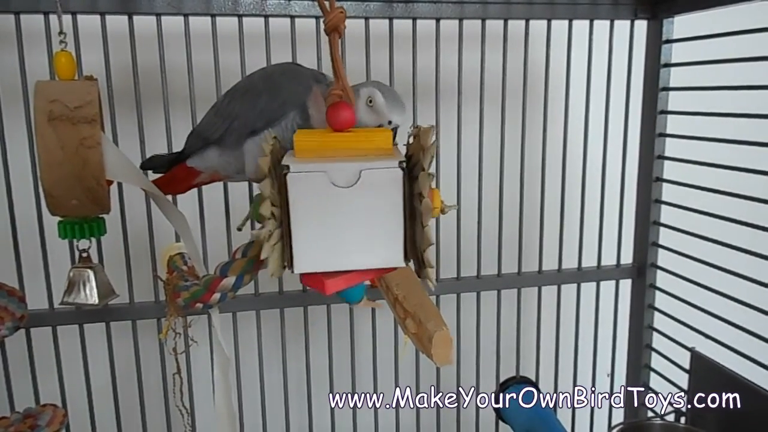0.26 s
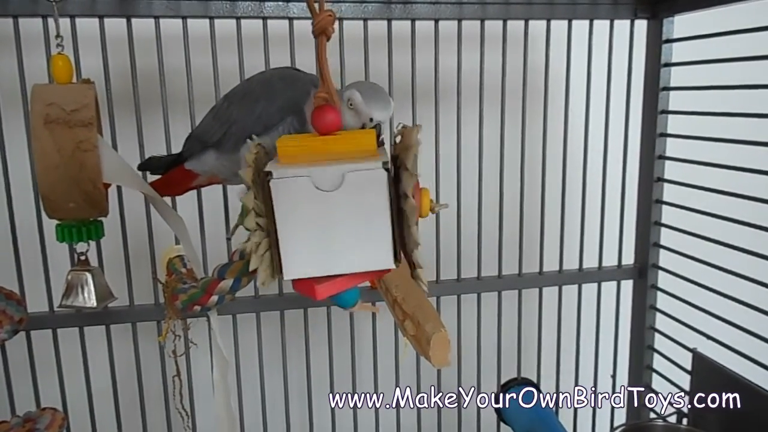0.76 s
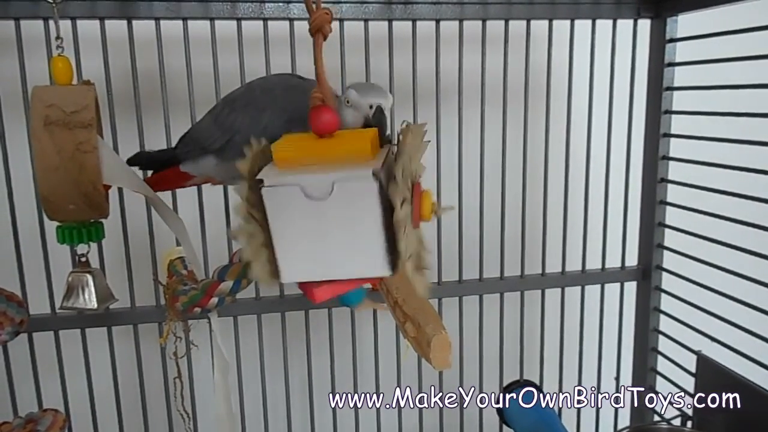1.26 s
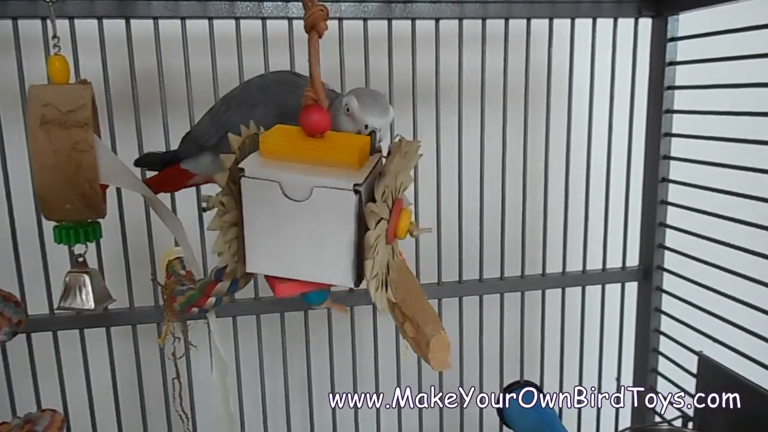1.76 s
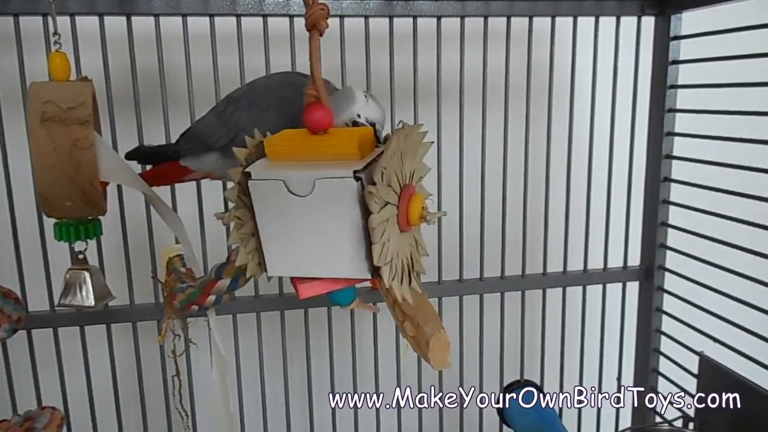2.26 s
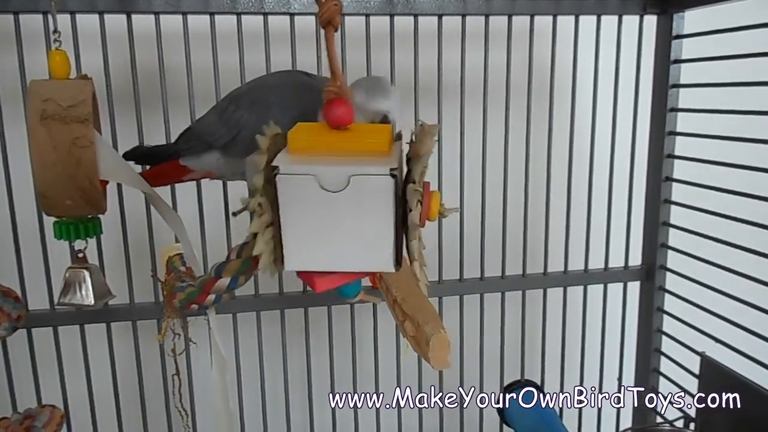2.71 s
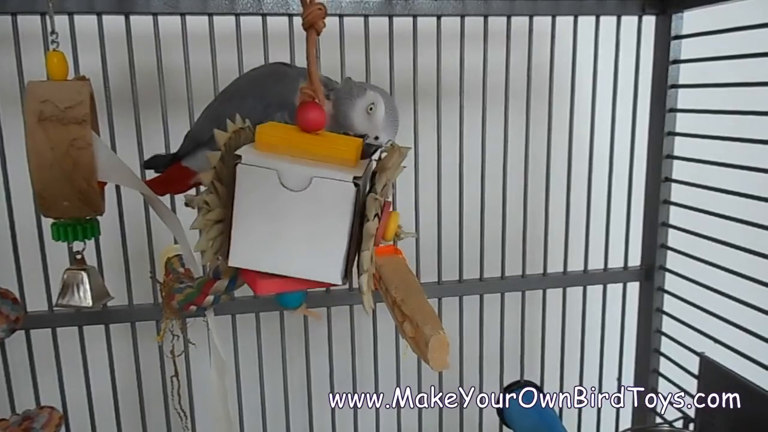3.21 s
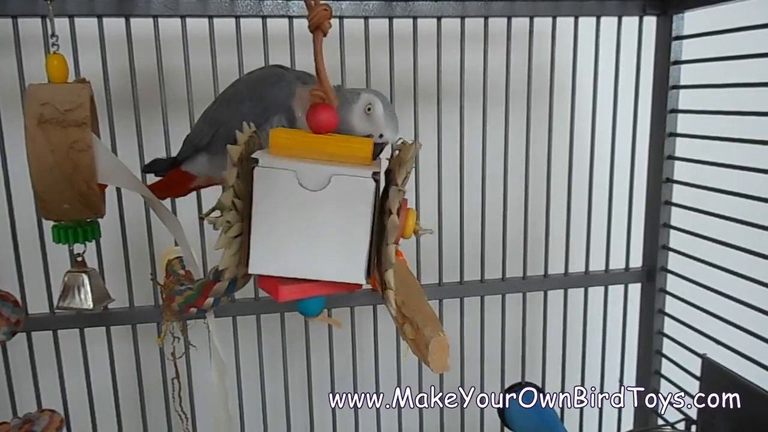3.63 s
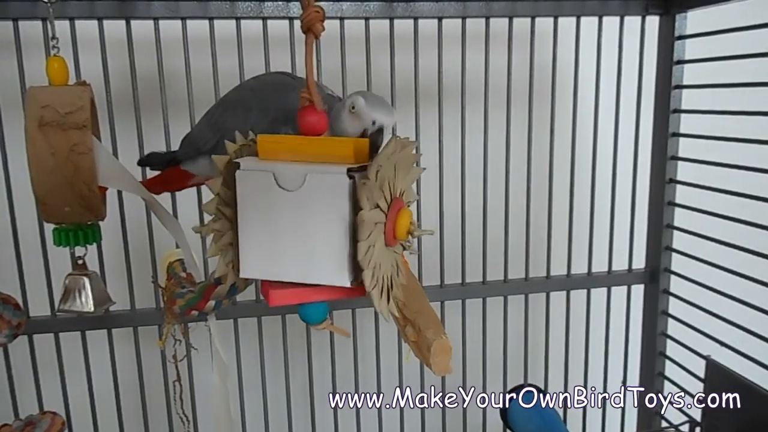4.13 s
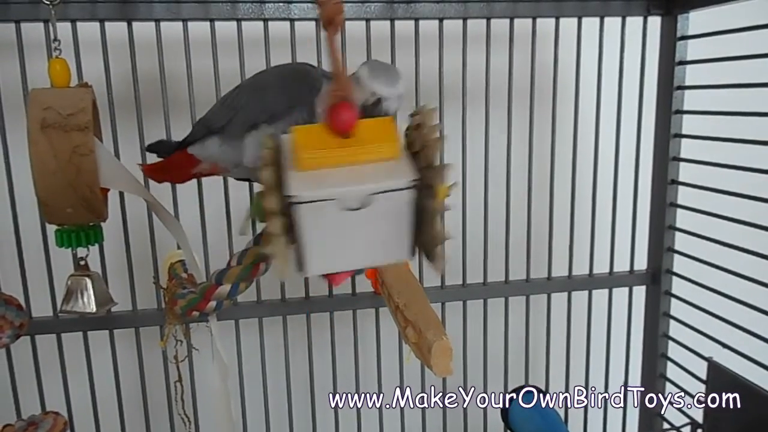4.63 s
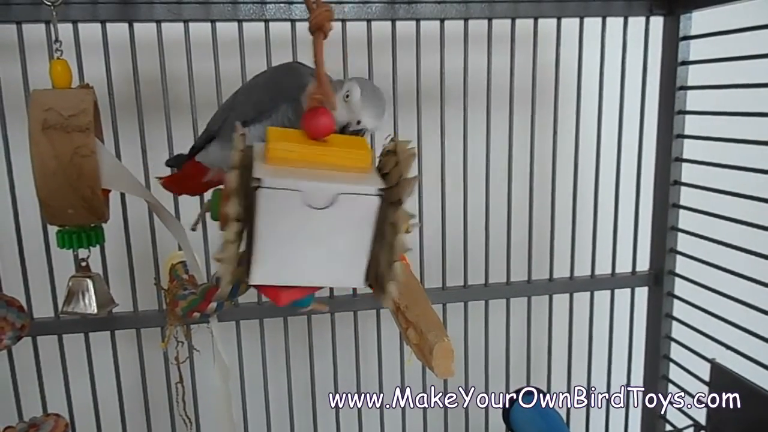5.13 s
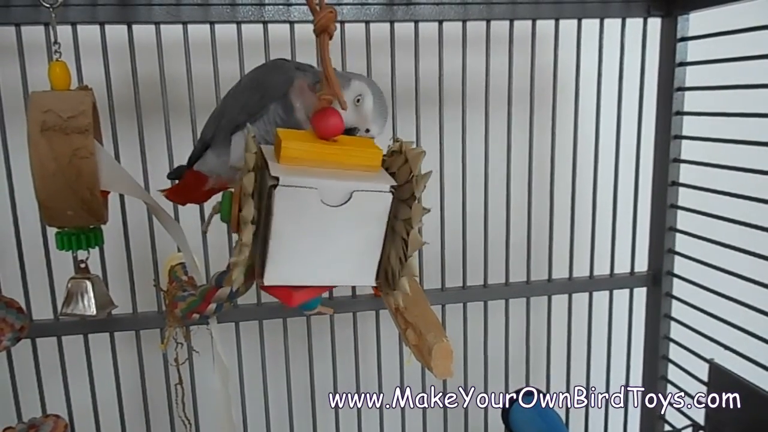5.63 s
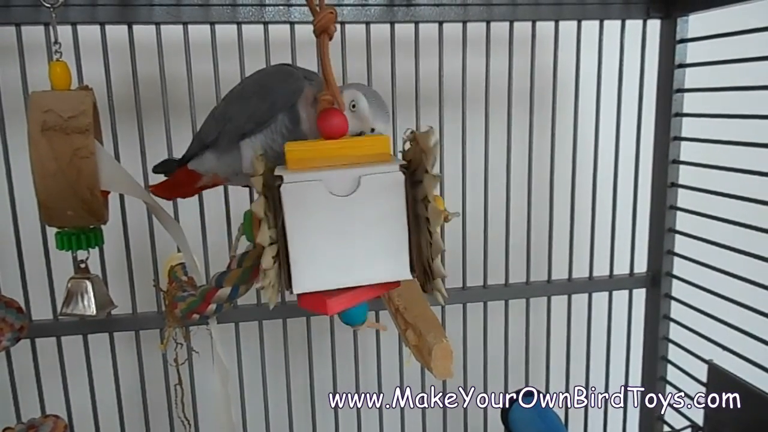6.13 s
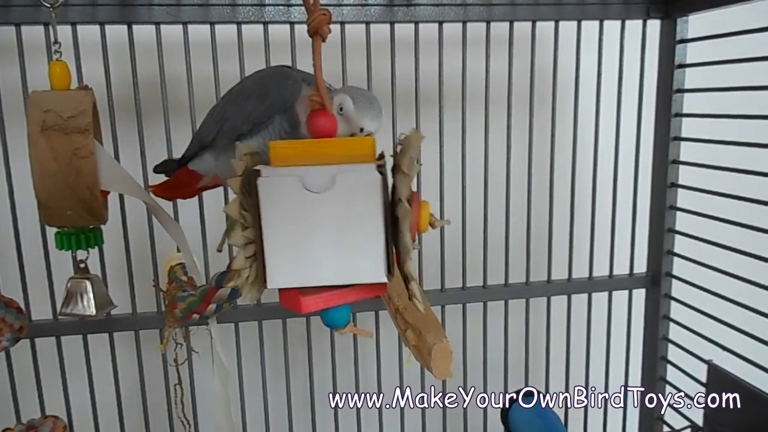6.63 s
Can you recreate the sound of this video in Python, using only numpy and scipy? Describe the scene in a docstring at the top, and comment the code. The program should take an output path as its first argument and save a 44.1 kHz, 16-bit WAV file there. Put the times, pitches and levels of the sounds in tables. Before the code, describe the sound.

Close to a cage indoors, a parrot's beak works a toy of cardboard and stiff dry leaf. Small creaks and crinkles come first, then a hollow rap and very loud cracking snaps. Midway a hard knock leads into a dull cardboard scrape. Irregular snaps and quiet rustling follow, ending on a raspy strip drag. A small microphone adds hiss and overloads on the hardest cracks.

```python
"""A parrot chews and tugs a hanging toy of cardboard and dry woven leaf in a cage indoors.
From the start: steady hiss, a faint rustle, creaks, and breaking fibres that snap and crinkle in leaf and box.
Thin dry ticks soon join; after a second the beak raps the hollow box, then torn strips ring single notes.
Midway the beak scrapes the cardboard once; at the very end a strip is dragged through it.
The room adds a tail, a low rumble swells under the loud sounds, and the small microphone overloads on the hardest."""
import sys
import numpy as np
from scipy import signal
from scipy.io import wavfile
from scipy.ndimage import uniform_filter1d

SR = 44100
rng = np.random.default_rng(int(sys.argv[2]) if len(sys.argv) > 2 else 0)


def persist_wave(psi):
    """Save psi, clipped to +-1, as 16-bit WAV."""
    counts = np.round(np.clip(psi, -1, 1) * 32767).astype(np.int16)
    wavfile.write(sys.argv[1], SR, np.atleast_2d(counts).T)


N = 302526  # length of the scene in samples


def amp(db):
    """Turn decibels into a plain multiplier."""
    return 10 ** (np.asarray(db) / 20)


def evened(x):
    """Scale a signal to an average (RMS) level of 1."""
    return x / np.sqrt(np.mean(x ** 2) + 1e-20)


def read(points, hz):
    """Read a curve between its points, on a logarithmic pitch scale."""
    point_hz, value = np.transpose(points)
    return np.interp(np.log(hz + 1), np.log(point_hz + 1), value)


def add(mix, s, sound):
    """Mix a sound in at time s, cutting off what runs past the end."""
    part = mix[..., round(s * SR):][..., :sound.shape[-1]]
    part += sound[..., :part.shape[-1]]


def soft_noise(shape, hold):
    """Slow random drift: noise averaged twice over `hold` samples."""
    return uniform_filter1d(uniform_filter1d(rng.standard_normal(shape), hold), hold)


def stroke_samples(length):
    """Length of a stroke in samples, kept between 0.01 and 0.3 s."""
    return round(np.clip(length, .01, .3) * SR)


def ring(modes, tilt_db=0, spread_db=0):
    """Response of a body to one click: sines that swell briefly and die, energy 1.
    Each spot that is bitten wakes the modes by other amounts, slightly off pitch."""
    t = np.arange(2048) / SR
    hz, width, db = np.transpose(modes)[..., None]
    db = db + tilt_db * np.log2(hz / hz[1])
    db = db + spread_db * rng.standard_normal(hz.shape)
    hz = hz * (1 + 0.018 * spread_db * rng.standard_normal(hz.shape))
    swell = width ** 1.647 * t * np.exp(-1.5 * np.pi * width * t)
    response = (amp(db) * swell * np.sin(2 * np.pi * hz * t)).sum(0)
    return response / np.linalg.norm(response)


def colour(points):
    """Filter response with the given spectrum that never sounds before its cause."""
    db = read(points, abs(np.fft.fftfreq(4096, 1 / SR)))
    log_gain = np.log(amp(np.maximum(db, -100)))
    return np.fft.ifft(np.exp(np.conj(signal.hilbert(log_gain)))).real[:2048]


def fibres(length, per_s, spread_db):
    """A train of tiny breaks of random sign, a few much larger than the rest."""
    chance, sign, size = rng.random((3, length))
    size_db = spread_db * np.minimum(-np.log(size + 1e-9), 4)
    return evened((chance < per_s / SR) * np.sign(sign - .5) * amp(size_db))


def crinkle(length):
    """Clumped fibre breaks; leaf, box and top flex partly together, partly on their own."""
    clumps = amp(2.16 * evened(soft_noise(length, 200)))
    shared = fibres(length, 2500, 2.6)
    own = np.array([fibres(length, 4000, 4.25) for _ in range(3)])
    return evened(clumps) * (0.9 * shared + 1.245 * own)


# Modes of the stiff leaf: (pitch [Hz], width [Hz], level before the width weighting [dB])
LEAF_MODES = [(2063, 102, 2), (2445, 262, 10.5), (2777, 260, 6.5), (3067, 72, 3.5), (3382, 990, 10)]
# Modes of the bitten box: (pitch [Hz], width [Hz], level before the width weighting [dB])
BOX_MODES = [(447, 730, 19), (761, 265, 21), (966, 163, 21), (1211.5, 103, 25.5), (1780, 260, 11)]
# Average spectrum of the crisp top: (pitch [Hz], level per Hz [dB])
CRISP_TOP = [(3000, -34), (4500, 8), (5500, 6), (7000, -0.5), (10000, -0.5), (12500, 0)]


def sounded(drive, leaf_tilt_db=0, box_tilt_db=0, spread_db=3.0):
    """Breaks ring the leaf, the box and the crisp top, which is lumpy in its own way at each spot."""
    hz = np.geomspace(CRISP_TOP[0][0], CRISP_TOP[-1][0], num=20)
    lumpy_db = read(CRISP_TOP, hz) + spread_db * rng.standard_normal(len(hz))
    crisp = colour(np.transpose([hz, lumpy_db]))
    leaf = ring(LEAF_MODES, leaf_tilt_db, spread_db)
    box = ring(BOX_MODES, box_tilt_db, spread_db)
    bodies = leaf, box, crisp / np.linalg.norm(crisp)
    return sum(signal.oaconvolve(row, body) for row, body in zip(drive, bodies))


def wandering(drive, hold, depth_db, *tilts_db, spread_db, count):
    """The breaks drift between several spots of the toy, each with its own ring."""
    share = amp(depth_db * evened(soft_noise((count, drive.shape[1]), hold)))
    share = share / np.linalg.norm(share, axis=0)  # the spots share one constant power
    return sum(sounded(drive * part, *tilts_db, spread_db=spread_db) for part in share)


# Spectrum of the hiss: (pitch [Hz], level per Hz [dB])
AIR_SPECTRUM = [(200, -1.5), (1000, 13), (5000, -2), (16000, -10.5)]
AIR_DB = -51  # hiss level before the microphone


def air():
    """Steady room hiss: random noise with a fixed colour."""
    noise = rng.standard_normal(N + 2048)
    hiss = signal.oaconvolve(noise, colour(AIR_SPECTRUM))[2048:N + 2048]
    return amp(AIR_DB) * evened(hiss)


# Faint rustle of the swinging toy: (time [s], leaf level [dB])
RUSTLE_LEVELS = [(0.0, -51), (0.53, -57.5), (1.03, -50), (2.25, -58.5), (3.28, -50.5), (3.4, -47.5),
                 (4.17, -54), (4.62, -45), (4.93, -49.5), (5.2, -47), (6.67, -58.5), (6.86, -45)]


def rustle():
    """A low bed of crinkle that follows the swing."""
    db = np.interp(np.arange(N) / SR, *np.transpose(RUSTLE_LEVELS))
    rows_db = db + np.array([[0], [-5], [-8]])  # leaf, box, crisp top
    return wandering(crinkle(N) * amp(rows_db), 3000, 5.5, spread_db=4, count=6)[:N]


# Creaks of a rubbed wall or leaf: (time [s], length [s], level [dB], first pitch [Hz], last pitch [Hz])
CREAK_EVENTS = [(0.009, 0.2, -38, 1300, 1370), (0.035, 0.045, -30.5, 2500, 3100),
                (0.098, 0.085, -35, 2300, 2640), (0.212, 0.031, -24.5, 3700, 3760),
                (0.484, 0.096, -42, 754, 720), (0.832, 0.041, -26.5, 4140, 2700),
                (0.91, 0.074, -39.5, 1300, 1260), (1.122, 0.094, -43.5, 820, 770),
                (1.939, 0.074, -39, 2200, 2260), (1.972, 0.044, -34, 770, 875)]
CREAK_Q = 4.3  # first pitch divided by band width


def creaks():
    """Uneven slips ring one sliding band of the rubbed part."""
    out = np.zeros(N)
    for s, length, db, hz, end_hz in CREAK_EVENTS:
        n = stroke_samples(length)
        turn = np.exp(2j * np.pi * np.cumsum(np.linspace(hz, end_hz, n)) / SR)
        r = np.exp(-np.pi * hz / CREAK_Q / SR)
        slips = fibres(SR // 3, 900, 2.9)[:n]
        # shift the moving band down to zero, let it ring there, then shift it back
        sound = (turn * signal.lfilter([1], [1, -2 * r, r * r], slips / turn)).real
        add(out, s, amp(db) * evened(sound) * signal.windows.tukey(n, .3))
    return out


# Snaps: (time [s], leaf level [dB], box level above leaf [dB], crisp top level above leaf [dB])
SNAP_EVENTS = [(0.014, -21, -12, -20), (0.1918, -18, -11, 1), (0.7563, -26, -6.5, -2),
               (0.825, -25.5, -25, -10), (0.9817, -27, -56, -6), (1.0235, -29.5, -27, 0),
               (1.099, -23, -15, 0), (1.2839, -25.5, -43, 1), (1.4316, -5.5, -12.5, -14.5),
               (1.5064, -6.5, -9, -7.5), (1.796, -24.5, -6, -9), (2.1458, -21.5, -3.5, 1),
               (2.1824, -24.5, -4.5, -5), (2.6021, -26, -10, -3), (2.6563, -28, -20, -6),
               (3.229, -26.5, -13, -7.5), (3.2637, -9, 0, -14.5), (3.4254, -16.5, -4, -8.5),
               (3.786, -25, -6, -6.5), (4.0527, -28.5, -9, -3.5), (4.08, -33, -24, -14),
               (4.245, -37.5, -36, -2), (4.2608, -28, -3, -2.5), (4.5342, -14, -6.5, -5.5),
               (4.582, -24.5, -6.5, 0.5), (4.6476, -12.5, -10.5, -10), (4.7779, -38, 9, 11),
               (4.9713, -29.5, 1, -25), (5.485, -25, -3.5, -4), (5.7871, -12.5, -7, -7),
               (5.8791, -19.5, -4, -6), (5.9432, -34, -1, 5), (6.1584, -24, -2.5, -2.5)]
# brightness rule: a quieter box tilts the leaf up (dB per octave for each dB away from even)
LEAF_TILT, EVEN_BOX_DB = -0.76, -10


def snaps():
    """Each snap is one break, then a dying burst of smaller ones; a harder snap tears on for longer."""
    out, t = np.zeros(N), np.arange(SR // 16) / SR
    for s, db, box_db, top_db in SNAP_EVENTS:
        hold = np.clip(0.0015 + 0.00062 * (db + 11.5), 0, .01)  # seconds before the burst fades
        fade_db = -60 * np.maximum(t - hold, 0) / 0.047
        burst = fibres(len(t), 9000, 4.67) * amp(fade_db)
        burst[0] += 4.5  # the first break
        drive = burst * amp([[db], [db + box_db], [db + top_db]])
        leaf_tilt_db = LEAF_TILT * (box_db - EVEN_BOX_DB)
        add(out, s, wandering(drive, 60, 14.4, leaf_tilt_db, spread_db=2.5, count=3))
    return out


# The beak crunches and drags:
# (time [s], length [s], leaf level [dB], box level above leaf [dB], crisp top level above leaf [dB])
STROKE_EVENTS = [(0.02, 0.2, -41, -14, -10.5), (0.079, 0.015, -32, -17, -14), (0.197, 0.062, -36, -4.5, 1),
                 (0.479, 0.12, -46, -3.5, -3), (0.678, 0.017, -42, -10.5, -3.5),
                 (0.751, 0.03, -36.5, -12.5, -4), (0.827, 0.062, -34.5, -22, -7.5),
                 (0.908, 0.12, -40, -12.5, -5), (1.113, 0.13, -42, -8, -3.5),
                 (1.269, 0.012, -32.5, -12, -12), (1.358, 0.022, -45, -28, 2),
                 (1.445, 0.16, -30, -7.5, -7.5), (1.743, 0.12, -42.5, -7, -2), (1.927, 0.098, -42, -5, -10),
                 (2.059, 0.032, -46.5, -1.5, -5.5), (2.172, 0.042, -38, -2.5, -2),
                 (2.262, 0.032, -43, -7.5, -7.5), (2.368, 0.046, -50.5, -3, -14),
                 (2.509, 0.13, -38.5, -5, -3.5), (2.708, 0.21, -46.5, -5.5, -8),
                 (2.822, 0.076, -38, -10, -11.5), (2.983, 0.041, -46.5, -4.5, -2),
                 (3.459, 0.055, -33, -9, -4), (3.653, 0.086, -45.5, -7.5, 0),
                 (3.723, 0.08, -39.5, -6, -1.5), (3.843, 0.13, -53, -5.5, -7),
                 (4.044, 0.051, -42, -4.5, -1), (4.259, 0.2, -54, 7, -32), (4.431, 0.13, -42, -4, -9),
                 (4.566, 0.078, -39, -3.5, -3), (4.65, 0.048, -29.5, -7, -4.5),
                 (4.701, 0.032, -28, -8, -3.5), (4.791, 0.13, -41.5, -1, -3),
                 (4.981, 0.12, -43.5, 1.5, -5.5), (5.095, 0.06, -40.5, 2.5, -5),
                 (5.421, 0.065, -36, -8.5, -3.5), (5.502, 0.047, -38.5, -6.5, -5),
                 (5.758, 0.019, -32.5, -1.5, -6), (5.802, 0.11, -43.5, -6, -2),
                 (6.013, 0.084, -50.5, 2, -18), (6.169, 0.073, -42, -5, -0.5), (6.491, 0.045, -45, 1, 0.5),
                 (6.738, 0.034, -46.5, 0.5, 3.5)]
BOX_TILT, DRAG_BOX_DB = -0.22, -8  # in a drag a quieter box is tilted up as well
DRAG_SPREAD_DB = 2  # a dragging beak slides over several spots that ring differently


def strokes():
    """Each stroke swells, crinkles and stops."""
    out = np.zeros(N)
    for s, length, db, box_db, top_db in STROKE_EVENTS:
        n = stroke_samples(length)
        drive = crinkle(SR // 3) * amp([[db], [db + box_db], [db + top_db]])
        drive *= np.pad(signal.windows.tukey(n, .5), (0, SR // 3 - n))
        tilts_db = LEAF_TILT * (box_db - EVEN_BOX_DB), BOX_TILT * (box_db - DRAG_BOX_DB)
        add(out, s, wandering(drive, 400, 4.7, *tilts_db, spread_db=DRAG_SPREAD_DB, count=3))
    return out


RUMBLE_DB, RUMBLE_HZ, RUMBLE_S = -34.5, 71, 0.027  # gain, top of the rumble, smoothing time


def rumble(toy):
    """A low rumble: deep noise follows the smoothed strength of the toy."""
    lowpass = signal.butter(2, RUMBLE_HZ, fs=SR, output="sos")
    low = signal.sosfilt(lowpass, rng.standard_normal(N))
    r = np.exp(-1 / (RUMBLE_S * SR))
    return amp(RUMBLE_DB) * evened(low) * signal.lfilter([1 - r], [1, -r], abs(toy))


# Dying time of the room's echoes: (pitch [Hz], time to fall 60 dB [s])
ROOM_DECAY = [(500, 0.89), (3000, 0.6), (8000, 0.48)]


def room(x):
    """Sparse echoes of random sign from bars and walls, each band dying at its own speed."""
    taps, at = np.zeros(SR // 2), np.arange(200, SR // 2 - 20, 20)
    taps[at + rng.integers(0, 20, len(at))] = rng.choice([-1., 1.], len(at))
    hz, t, bands = signal.stft(taps, SR, nperseg=256)
    decay_s = np.maximum(read(ROOM_DECAY, hz), .05)[:, None]
    tail = signal.istft(bands * amp(-60 * t / decay_s), SR, nperseg=256)[1]
    return signal.oaconvolve(x, tail / np.linalg.norm(tail))[:N]


# Single dry fibres that stand out: (time [s], level [dB])
TICK_EVENTS = [(0.391, -13), (0.738, -11), (1.7514, -12), (1.8524, -13), (2.837, -19), (3.017, -12.5)]


def ticks():
    """Thin dry ticks: single breaks, mostly in the crisp top."""
    breaks = np.zeros(N)
    for s, db in TICK_EVENTS:
        add(breaks, s, amp([db]))
    return sounded(breaks * amp([[-4], [-15], [0]]))[:N]  # leaf, box, crisp top


# The beak raps the box: (time [s], peak level [dB], pitch that the spot favours [Hz], stiff face level [dB])
KNOCK_EVENTS = [(1.2638, -6.5, 650, 3), (3.2633, -1.5, 1014, 6.5), (6.159, -11, 900, -20)]
# Air and walls of the box: (pitch [Hz], width [Hz], level at the favoured pitch [dB])
HOLLOW_MODES = [(580, 104, -2.5), (697, 68, 3.5), (767, 83, 5), (934, 51, -2), (1031, 64, 4.5),
                (1204, 65, 1.5)]
SPOT_FALL_DB = -20  # modes fall off per octave from the favoured pitch
FACE_HZ, FACE_WIDTH = 2390, 140  # ring of the stiff face: pitch and width in Hz


def knocks():
    """A rap sets the hollow box and its face ringing at once."""
    out, t = np.zeros(N), np.arange(2048) / SR
    onset = np.sin(np.pi / 2 * np.minimum(1, t / 0.0016)) ** 2
    for s, peak_db, spot_hz, face_db in KNOCK_EVENTS:
        modes = [(hz, width, db + SPOT_FALL_DB * abs(np.log2(hz / spot_hz)))
                 for hz, width, db in HOLLOW_MODES]
        modes.append((FACE_HZ, FACE_WIDTH, face_db))
        sound = sum(amp(db) * np.exp(-np.pi * width * t) * np.sin(2 * np.pi * hz * t)
                    for hz, width, db in modes)
        sound = sound * onset
        add(out, s, amp(peak_db) * sound / abs(sound).max())
    return out


# A stiff leaf strip breaks clean and rings one note: (time [s], level [dB], pitch [Hz])
PING_EVENTS = [(1.506, 0, 2340), (1.5588, -3, 2070), (3.2643, -6, 3740), (3.424, -2, 3830),
               (4.7028, -3.5, 2750), (4.9716, -15.5, 2400), (5.787, 3.5, 2880), (5.8805, -4.5, 2300)]
PING_Q, PING_CLICK = 7, 0.77  # pitch divided by width; click size relative to the note


def pings():
    """A click, then a few cycles of the freed strip."""
    out, t = np.zeros(N), np.arange(1024) / SR
    for s, db, hz in PING_EVENTS:
        sound = np.exp(-np.pi * hz / PING_Q * t) * np.sin(2 * np.pi * hz * t)
        sound[0] += PING_CLICK
        add(out, s, amp(db) * sound)
    return out


# The beak scrapes the cardboard face: (time [s], length [s], starting level [dB])
SCRAPE_EVENTS = [(3.287, 0.168, -23)]
# Spectrum of scraped cardboard: (pitch [Hz], level per Hz [dB])
CARD_SPECTRUM = [(400, -58), (760, -10), (1250, 8), (2050, -4), (2450, -3), (3340, -19), (5860, -20),
                 (9000, -55)]
SCRAPE_FADE_DB = -7  # change over the length of a scrape


def scrapes():
    """A dense, dull rasp of many tiny breaks that rises quickly and fades."""
    out, card = np.zeros(N), colour(CARD_SPECTRUM)
    for s, length, db in SCRAPE_EVENTS:
        n = stroke_samples(length)
        rasping = evened(signal.oaconvolve(fibres(SR // 3, 7000, 3.0), card))[:n]
        level = amp(db + SCRAPE_FADE_DB * np.arange(n) / n)
        add(out, s, level * rasping * signal.windows.tukey(n, .25))
    return out


# A strip is dragged through the beak: (time [s], level [dB], pitch of its lowest band [Hz])
RASP_PATH = [(6.78, -45, 1750), (6.798, -27.5, 1880), (6.86, -26, 1830)]
# Bands of the strip: (multiple of the lowest pitch, width [Hz], level [dB])
STRIP_BANDS = [(1, 500, 1), (1.65, 352, -5), (2.27, 450, -10.5)]


def rasp():
    """Fast uneven slips ring three bands of the dragged strip; returns its start time and sound."""
    s, db, hz = np.transpose(RASP_PATH)
    t = np.arange(s[0], N / SR, 1 / SR)
    slips, sound = fibres(len(t), 4000, 0.59), 0
    for multiple, width, band_db in STRIP_BANDS:
        turn = np.exp(2j * np.pi * np.cumsum(multiple * np.interp(t, s, hz)) / SR)
        r = np.exp(-np.pi * width / SR)
        band = (turn * signal.lfilter([1], [1, -2 * r, r * r], slips / turn)).real
        sound = sound + amp(band_db) * evened(band)
    fade_in = np.minimum(1, (t - s[0]) / 0.018)
    return s[0], amp(np.interp(t, s, db)) * evened(sound) * fade_in


def scene():
    """All sounds of the toy together, then the room, the low rumble and the hiss."""
    toy = rustle() + creaks() + snaps() + strokes() + ticks() + knocks() + pings() + scrapes()
    add(toy, *rasp())
    # a small toy radiates little bass
    toy = signal.sosfilt(signal.butter(3, 420, "high", fs=SR, output="sos"), toy)
    return (toy + amp(-10.0) * room(toy) + rumble(toy) + air())[None]


# Colour of the microphone: (pitch [Hz], level [dB])
MIC_COLOUR = [(20, -17.5), (150, -1.5), (500, -11), (1000, -6.5), (8000, -5.5), (10000, -17),
              (11500, -37.5), (16000, -52)]
# gain control: start level, share of the excess taken away, recovery of the excess
DUCK_FROM_DB, DUCK_SHARE, RECOVER_DB_PER_S = -22.5, 0.34, 23.5
CEILING, EDGE_HZ = .5, 16300  # overload level; upper band limit


def record(dry):
    """The capsule drops bass and top, gain control dips after hard snaps,
    the input stage flattens the peaks; then the band limit."""
    heard = signal.oaconvolve(dry, colour(MIC_COLOUR)[None])[:, :N]
    power = signal.lfilter(np.ones(300) / 300, 1, heard[0] ** 2)
    power_db = 10 * np.log10(power.clip(1e-12))
    fall = np.arange(N) * RECOVER_DB_PER_S / SR
    held_db = np.maximum.accumulate(power_db + fall) - fall  # jumps up at once, sinks steadily
    over_db = np.maximum(held_db - DUCK_FROM_DB, 0)
    smooth_over_db = signal.lfilter(np.ones(400) / 400, 1, over_db)
    heard = heard / amp(DUCK_SHARE * smooth_over_db)
    clipped = heard / (1 + abs(heard / CEILING) ** 5) ** (1 / 5)
    band_limit = signal.firwin(511, EDGE_HZ, window=("kaiser", 9), fs=SR)
    return signal.oaconvolve(clipped, band_limit[None], "same")


dry = scene()
out = record(dry)
persist_wave(out)
```